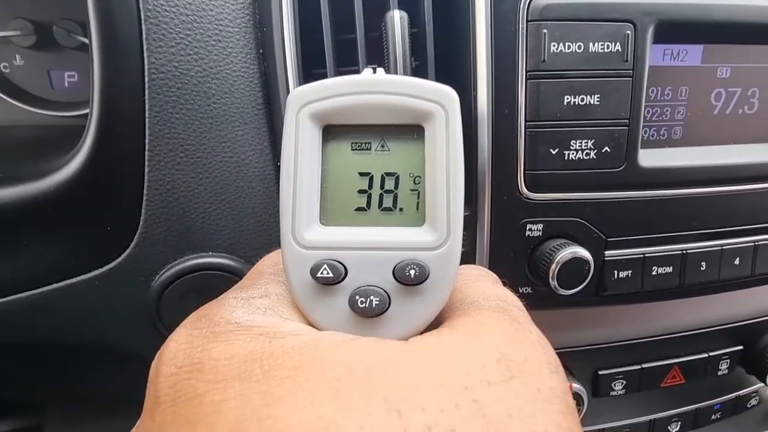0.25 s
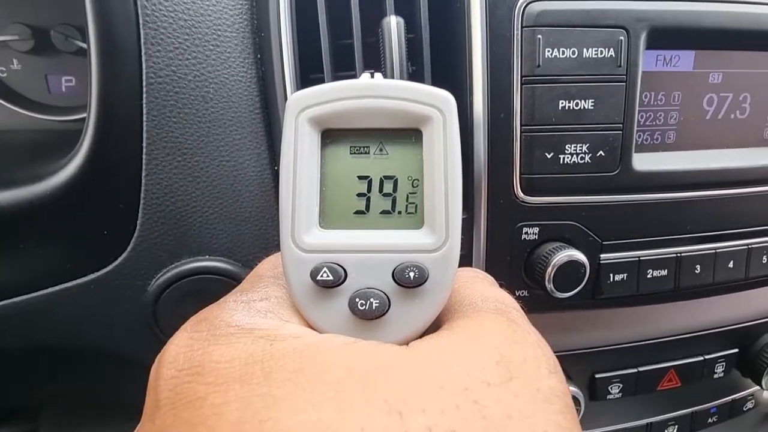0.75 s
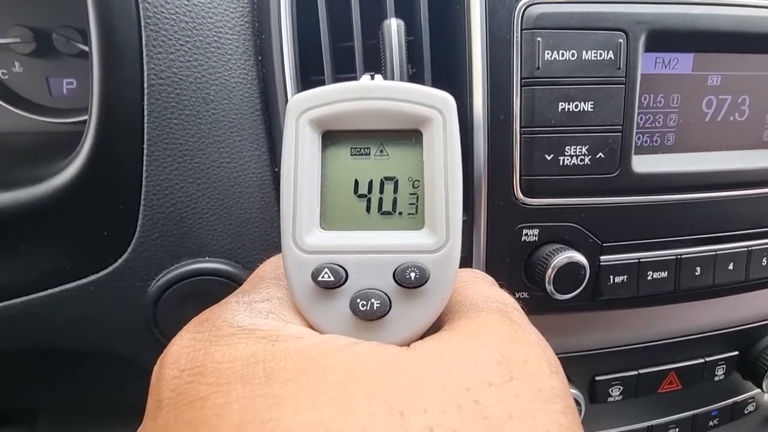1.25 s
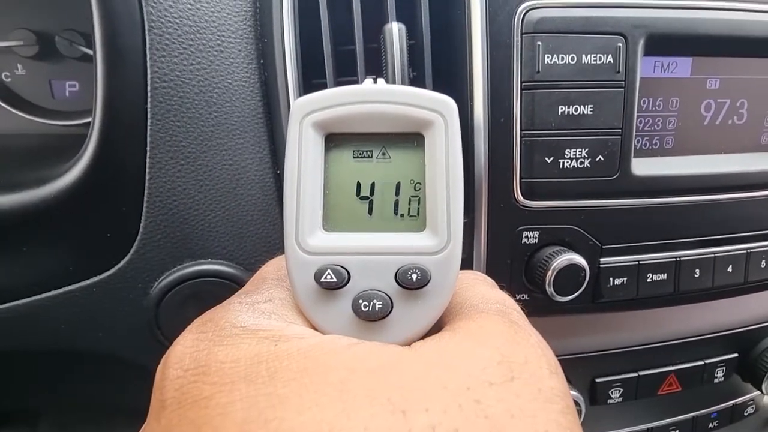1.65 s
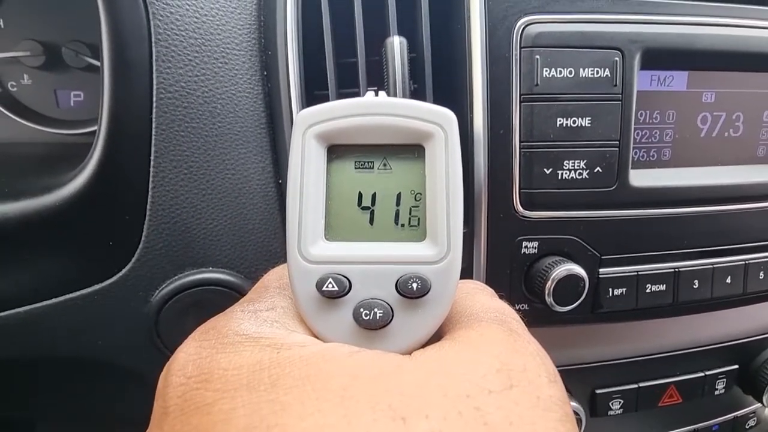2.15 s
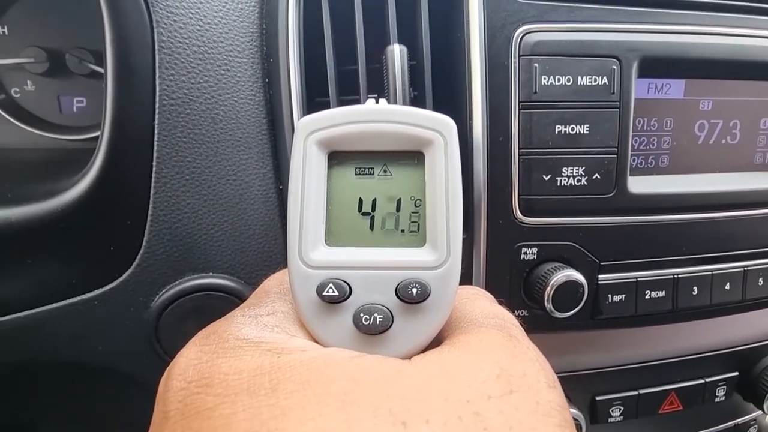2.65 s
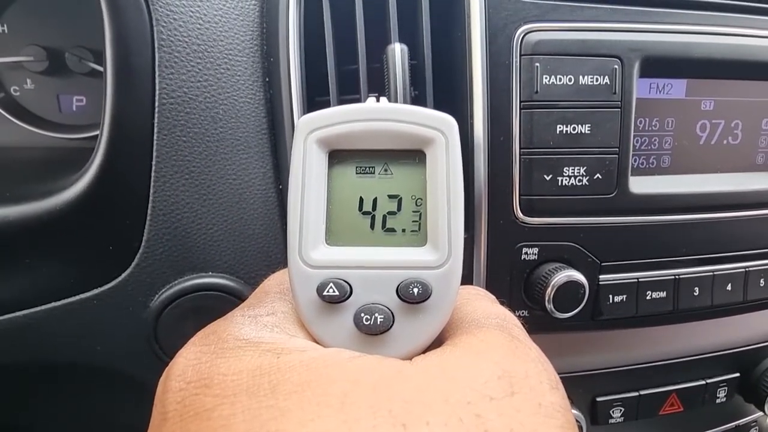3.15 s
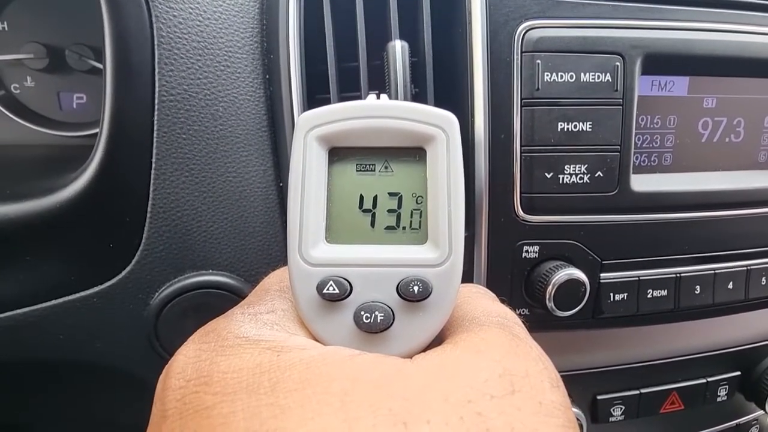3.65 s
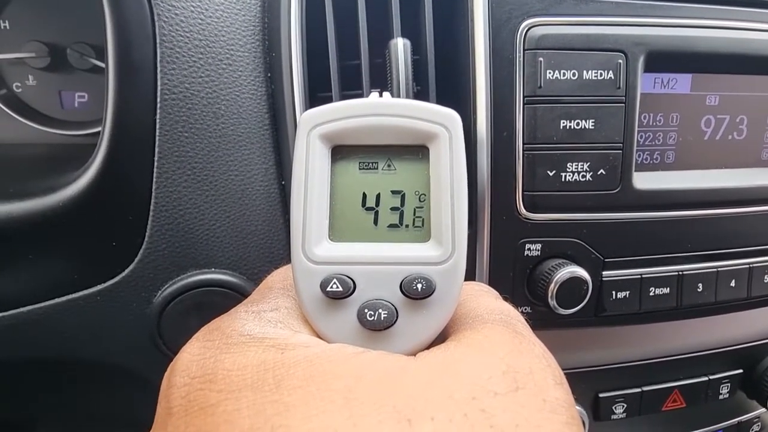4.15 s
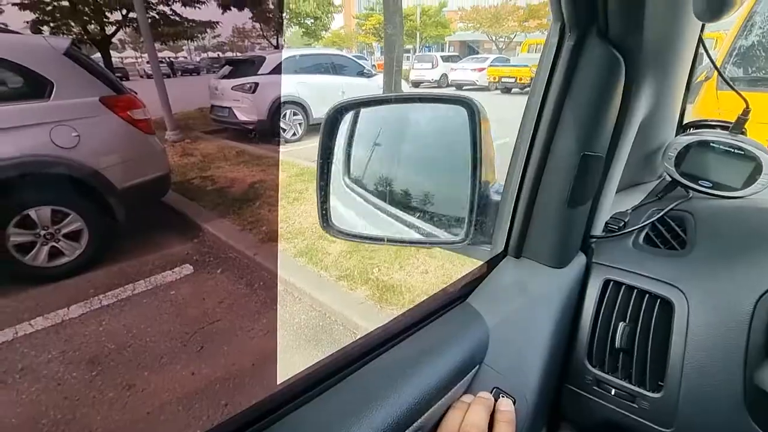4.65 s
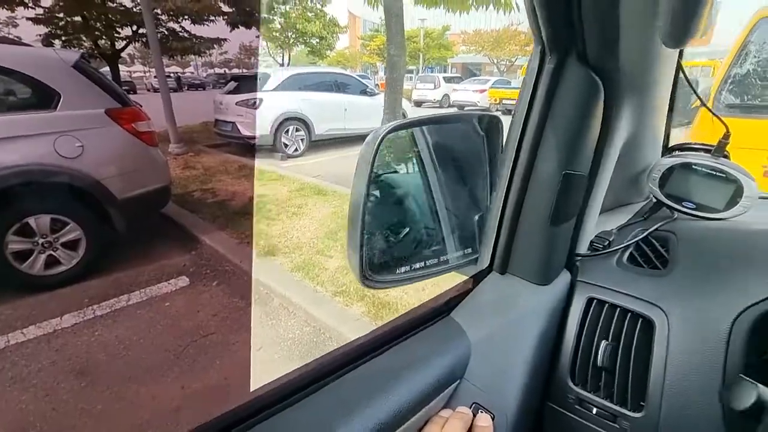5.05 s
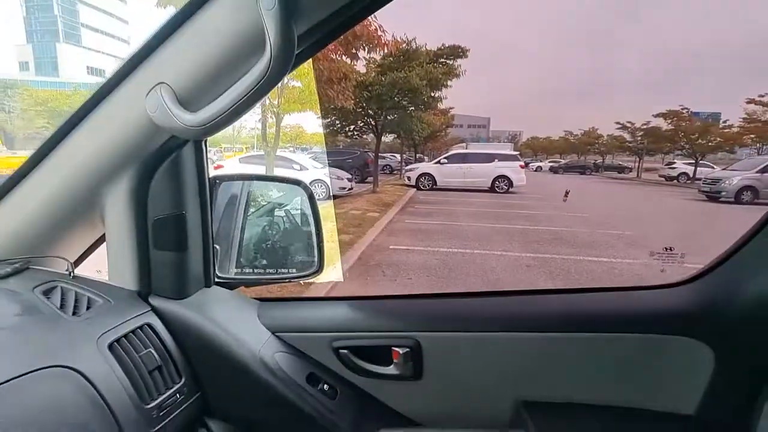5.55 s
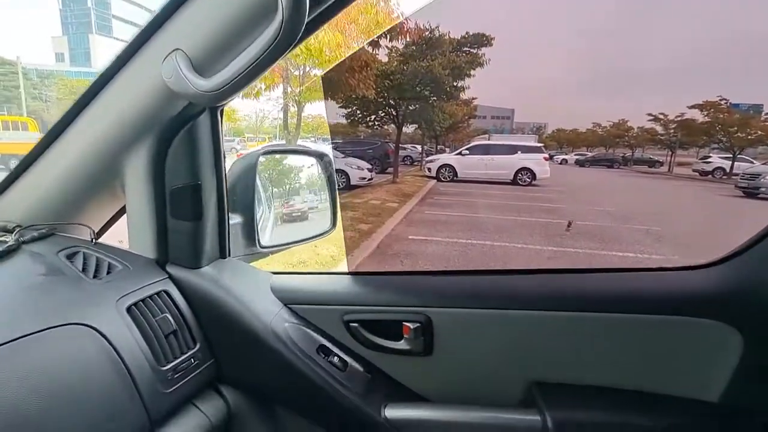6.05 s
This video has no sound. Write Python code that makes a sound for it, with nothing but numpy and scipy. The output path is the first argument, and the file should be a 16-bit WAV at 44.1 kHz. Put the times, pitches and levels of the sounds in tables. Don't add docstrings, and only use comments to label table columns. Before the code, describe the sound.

A tiny scrap of blower noise at 0 s is cut off, leaving silence until 0.12 s. Then a loud, close rush of dashboard vent air holds until 4.37 s: midrange turbulence, low boom and irregular buffeting on the microphone, gusts leaning left, engine idling underneath. Dull panel knocks come near 0.95, 1.7, 3.4 and 4.1 s; a small hand bump ends it. After a brief silence, from 4.45 s the cabin is far quieter, with a soft engine hum sped up to triple pitch and muffled bay noise. A very faint high belt tone arcs around 4.6-5.0 s. Around 5.2 s the sound shifts from left door to right, with slight hiss and a tiny tick at 5.53 s. At 5.93-5.98 s a plastic switch clicks sharply, with soft door thuds; then a window motor whines, rising quickly and sagging, with low door hum and faint sliding hiss until the cut at 6.4 s.

```python
import sys
import numpy as np
from scipy import signal
from scipy.fft import rfft, irfft, next_fast_len
from scipy.io import wavfile
from scipy.ndimage import uniform_filter1d

SR = 44100
rng = np.random.default_rng(int(sys.argv[2]) if len(sys.argv) > 2 else 0)


def transcribe(signal):
    frames = np.atleast_2d(signal).T
    limited = np.clip(frames, -1, 1)
    pcm = np.round(limited * 32767).astype(np.int16)
    wavfile.write(sys.argv[1], SR, pcm)


def level_to_linear(level):
    exponent = np.asarray(level, float) / 20
    return 10 ** exponent


N = 278271
T_S = np.arange(N) / SR
FIRING_HZ, SPEED_UP = 26.0, 3

# (start [s], end [s])
SHOTS = [
    (0, .0243),
    (.1204, 4.3655),
    (4.4523, 6.4),
]

# (multiple of firing rate [1], left [dB], right [dB])
IDLE_AT_VENT = [(0.75, -51, -51), (1, -43, -44), (2, -43, -43), (3, -44, -49), (4, -56, -54), (5, -58, -59),
                (6, -52, -53), (7, -49, -59), (8, -56, -66), (12, -69, -66), (14, -65, -64), (15, -65, -72),
                (16, -65, -69), (17, -64, -61), (18, -72, -55), (19, -58, -64), (20, -74, -57),
                (21, -62, -67), (22, -57, -58), (23, -65, -61), (24, -58, -62), (25, -75, -64),
                (26, -64, -78), (28, -63, -69), (30, -75, -80), (32, -76, -73), (34, -73, -84)]
IDLE_LEFT_DOOR = [(0.75, -69, -71), (1, -60, -62), (1.75, -77, -77), (2, -63, -65), (2.75, -74, -79),
                  (3, -51, -54), (4, -60, -64), (5, -68, -70), (6, -68, -69), (7, -70, -70), (8, -76, -87),
                  (9, -81, -75), (11, -77, -80), (14, -84, -88), (18, -76, -86), (20, -83, -78),
                  (21, -86, -89), (23, -80, -76), (24, -79, -85)]
IDLE_RIGHT_DOOR = [(0.75, -70, -72), (1, -63, -65), (1.75, -74, -76), (2, -59.5, -62.5), (2.75, -69, -71),
                   (3, -66, -69), (4, -73, -69), (5, -87, -85), (6, -78, -91), (7, -70, -77), (8, -83, -90),
                   (9, -88, -93), (11, -86, -100), (14, -88, -89), (18, -78, -86), (20, -78, -84),
                   (21, -79, -84), (23, -83, -98), (24, -86, -86)]

# (frequency [Hz], likeness [0-1], right lead [rad], left-right [dB])
PORTS_AT_VENT = [(38, .75, -.1, 1.5), (90, .5, -.1, 6), (125, .33, 0, 10), (165, .4, .2, 5),
                 (230, .35, .8, 5), (334, .22, 1.5, 5), (470, .42, 1.1, 0), (570, .5, 1, 0),
                 (700, .33, 2.8, 2), (1100, .35, 3, 1.5), (1600, .62, 3.5, 0), (2200, .42, 3.7, -2),
                 (2700, .15, 3.7, -4), (7000, .2, 3.7, -2.5)]
PORTS_LEFT_DOOR = [(38, 0.99, 0.0, 1.5), (81, 1.0, 0.0, 1.9), (140, 0.99, -0.0, 1.7), (224, 0.99, 0.1, 2.7),
                   (334, 0.99, -0.0, 2.9), (473, 0.93, 0.1, 1.2), (669, 0.85, 0.8, 0.5),
                   (959, 0.65, 0.8, 3.3), (1356, 0.48, 2.2, 4.7), (1876, 0.65, 3.1, 0.8),
                   (2653, 0.7, 2.1, 0.4), (4000, 0.51, 2.9, 0.0), (6708, 0.32, 4.5, -2.3),
                   (11618, 0.37, 3.4, -1.7)]
PORTS_RIGHT_DOOR = [(38, 0.99, 0.0, 2.0), (81, 0.99, 0.0, 1.9), (140, 0.99, 0.0, 2.5),
                    (224, 0.99, -0.0, 1.5), (334, 0.97, -0.0, 0.8), (473, 0.65, -0.7, 1.2),
                    (669, 0.71, -0.9, 7.4), (959, 0.71, 0.3, 5.5), (1356, 0.48, -0.2, 1.6),
                    (1876, 0.64, 0.3, 4.5), (2653, 0.61, 3.4, -0.7), (4000, 0.58, 3.4, -0.3),
                    (6708, 0.37, 3.6, -0.8), (11618, 0.36, 3.6, -1.9)]

# (frequency [Hz], density [dB per Hz])
BUFFET_COLOUR = [(12, -43.5), (18, -11), (40, -4.5), (65, 3.5), (100, -1), (125, -11), (200, -20),
                 (400, -26.5), (800, -84.5), (3000, -120)]
RUSH_COLOUR = [(150, -17.5), (280, -5), (410, -6.5), (540, -2.5), (700, -6.5), (880, -13.5), (1500, -14.5),
               (2300, -22.5), (3400, -25), (4300, -26.5), (4800, -33.5), (6700, -31.5), (8200, -40.5),
               (10000, -53), (12000, -57), (12100, -68), (12700, -64), (12900, -95)]
BOOM_COLOUR = [(100, -31), (140, -9.5), (165, -3.5), (188, 0), (215, -3), (260, -19.5), (400, -32.5),
               (600, -90.5), (3000, -120)]
CABIN_LEFT_COLOUR = [(20, -40), (45, -17), (65, -8), (120, -4), (240, 3), (420, -6), (700, -6), (1250, -17),
                     (1600, -11), (2100, -17.5), (3000, -21), (6000, -26.5), (11700, -36), (13000, -50)]
CABIN_RIGHT_COLOUR = [(40, -30), (65, -4), (120, -9.5), (240, 0.5), (310, -4), (360, -6.5), (460, -14.5),
                      (600, -11), (900, -23.5), (1600, -25), (2400, -21), (6000, -31.5), (11000, -39),
                      (13000, -47)]
HISS_COLOUR = [(2000, -13), (4000, -7), (8000, -4), (12000, -6), (15700, -7), (15900, -48)]

# (frequency [Hz], width [Hz], left [dB], right [dB])
DASH_WAVES = [(450, 25, 0, 1.5), (590, 25, -1.5, -3.5), (716, 16, -3.5, -4), (776, 25, 4, 4),
              (994, 40, 2, 5.5), (1051, 46, 5, -4.5), (1154, 35, -5, 2), (1507, 77, 2, 3),
              (1685, 48, -4, -2.5), (1854, 52, 4, -2.5), (2036, 79, 2, 4.5), (2270, 150, 0.5, 2),
              (2410, 110, 1.5, 5), (2600, 80, 2, 1.5), (3380, 59, 1.5, 4.5), (6630, 160, -1, 0.5),
              (7540, 260, 4, 3), (8700, 100, 5, -1)]
TRIM_LEFT = [(350, 12, 0, 1), (430.4, 20, 5, 7.5), (636, 22, 5, 3), (2390, 260, 11.5, 12.5),
             (2800, 100, 6, 6)]
TRIM_RIGHT = [(208.7, 9.9, 8.1, 6.9), (537, 25, 2.3, 5.5), (631, 12, 7.1, 6), (1024, 88, 9.1, 7),
              (1540, 97, 10, 5.1), (1922, 94, 4.6, 1.5)]
BUFFET_PEAKS = [(51.6, 5.9, 4.5, 5), (77.7, 14, 4.5, 4.5)]

# (time [s], buffeting [dB])
DRAUGHT = [(0.13, -43.5), (0.42, -33.5), (0.74, -41.5), (0.99, -30.5), (1.0, -33), (2.32, -34),
           (2.34, -28.5), (2.49, -32.5), (2.97, -36), (3.57, -30), (3.59, -37.5), (3.85, -30.5),
           (4.15, -41), (4.36, -29.5)]
# (time [s], buffeting [dB], duct boom [dB], half length [s])
GUSTS = [(.01, -7, -3, .03), (0.402, 3, 4, 0.043), (0.553, 7, -5, 0.023), (.68, -0.5, -2, 0.045),
         (0.987, 3.5, 0.5, 0.026), (1.04, -4, -2, 0.022), (1.099, 3.5, 6, 0.024), (1.349, 2, 4, .03),
         (1.398, -7, 0, .02), (1.45, 2, -2, 0.034), (1.662, 6, 3.5, 0.022), (1.712, -1.5, -3, .03),
         (1.80, 2, -4.5, 0.032), (2.056, 3, 0, 0.028), (2.26, 1.5, -8, 0.022), (2.305, 0, 5.5, 0.019),
         (2.355, 1.5, -4.5, 0.063), (2.497, -0.5, -8, .03), (2.693, 1.5, 3.5, 0.064), (2.91, 3.5, 5, 0.036),
         (2.962, -4.5, -4.5, 0.037), (3.128, 4, 2, .03), (3.561, 4.5, 2, 0.027), (3.597, -5, -4.5, .03),
         (3.726, 3, 5.5, 0.041), (3.854, 0.5, 4.5, 0.043), (4.03, -3, -4.5, .05), (4.17, -4, -3, .04),
         (4.258, 5, 0, .02), (.27, -0.5, 3.5, .05), (1.92, 2, -1.5, .04), (4.21, -2.5, 0, .03),
         (4.31, -1, 0.5, .025), (0.332, 0, 3, .03), (.50, 2, 0.5, .02), (0.622, 1.5, 0, .03),
         (1.76, 2, -1, .02), (3.043, 2, -1, .03), (3.30, 1, 1, .03)]
# (time [s], left-right [dB])
AIM = [(0.1, -2.5), (.7, -3), (1.2, 0), (2.2, -0.5), (2.8, 0), (3.7, 0), (4.0, -0.5), (4.36, -3)]
# (time [s], peak [dB])
PANEL_KNOCKS = [
    (1.722, -31),
    (.953, -40),
    (3.375, -40),
    (4.144, -38),
]
# (peak time [s], height [full scale], rise [s])
END_SWINGS = [
    (.022, .026, .008),
    (4.363, -.05, .007),
]

# (time [s], knock peak [dB], rub rms [dB], left-right [dB], length [s])
CONTACTS = [(4.347, -43, -54, -14, 0.00039), (4.4715, -71, -57, -5, 0.0034), (5.528, -64, -68, 5, 0.0028),
            (5.532, -68, -74, 6, 0.0046), (5.929, -70, -56, 0, .01), (5.931, -57, -62, 3, 0.0051),
            (5.935, -50, -48, 1, 0.0086), (5.9412, -56, -62, 3, 0.0045), (5.9446, -54, -60, 3, 0.004),
            (5.949, -55, -62, 11, 0.0043), (5.96, -57, -49.5, -2, 0.0075), (5.967, -58, -62, 0, 0.0042),
            (5.982, -67, -58, -5, 0.021)]
# (frequency [Hz], level [dB], T60 [s])
SWITCH_MODES = [(169, -10, .035), (300, -9, .025), (704, -23, .01), (1055, -8.5, 0.079), (1400, -19, .009),
                (1770, -13, .009), (2055, 1.5, 0.019), (2430, -0.5, 0.014), (2900, -15, .007),
                (3300, -15, .012), (3790, -14, 0.016), (4430, -20, .006)]
# (time [s], peak [dB])
SPRING_TICKS = [
    (4.4712, -62),
    (4.5315, -60),
]
# (time [s], peak [dB], frequency [Hz], T60 [s], left-right [dB])
PART_RINGS = [(1.088, -38, 300, .05, 3), (3.545, -37, 300, .06, 3), (3.745, -40, 310, .06, 3),
              (3.893, -36, 290, .07, 3), (4.955, -58, 115, .2, 2), (5.5292, -47, 2200, .012, 5),
              (5.5325, -55, 1055, .05, 6), (5.9414, -33.5, 2055, .022, 1), (5.9416, -36.5, 2430, .017, 2.5),
              (5.9425, -48, 1055, .075, 2), (5.9445, -49, 3790, .02, 2), (5.9435, -48, 3250, .016, 2),
              (5.935, -46, 350, .06, 1), (5.945, -50, 78, .12, 2), (5.9495, -46, 2200, .014, 8),
              (5.9675, -55, 2000, .012, 0)]
# (time [s], peak [dB])
DOOR_THUDS = [
    (5.9346, -42),
    (5.9475, -44),
    (5.9593, -42),
]
# (frequency [Hz], level [dB], T60 [s])
DOOR_SKIN = [(78, -7, .08), (160, -4, .07), (240, -8, .05), (350, -7, 0.054)]
# (time [s], commutator rate [Hz], whine [dB], door hum [dB])
MOTOR_SPEED = [(5.985, 1962, 0, 0), (5.994, 2020, -2, -2), (6.002, 2283, -4, 0), (6.022, 2440, -1, -5),
               (6.04, 2410, 1, 4), (6.066, 2387, 0, -1), (6.106, 2335, 1, 0.5), (6.16, 2368, -3, -3),
               (6.197, 2385, -6, 0), (6.24, 2295, 0, 0.5), (6.282, 2185, -1, -1), (6.32, 2140, -4, 2)]


def rms_one(x):
    return x / np.sqrt(np.mean(x ** 2) + 1e-20)


def peak_one(x):
    return x / np.max(np.abs(x))


def in_time(rows):
    s, *columns = np.transpose(rows)
    return [np.interp(T_S, s, c) for c in columns]


def at_hz(points, hz):
    f, *columns = np.transpose(points)
    return [np.interp(np.log(hz + 1), np.log(f), c) for c in columns]


def ramp(start_s, length_s):
    return np.clip((T_S - start_s) / length_s, 0, 1)


def balance(left_right_db):
    return level_to_linear(np.outer([.5, -.5], left_right_db))


def impulses(events):
    out = np.zeros(N)
    for s, db in events:
        out[round(s * SR)] = level_to_linear(db)
    return out


def ring(force, hz, t60_s):
    r, w = level_to_linear(-60 / (t60_s * SR)), 2 * np.pi * hz / SR
    return signal.lfilter([0, np.sin(w)], [1, -2 * r * np.cos(w), r * r], force + 1e-18)


def drift(rate_hz, count=1):
    hop = 40
    r = np.exp(-2 * np.pi * hop * rate_hz / SR)
    coarse = rng.standard_normal((count, N // hop + 2002))
    slow = signal.lfilter([1], [1, -2 * r, r * r], coarse)[:, 2000:]
    return np.array([np.interp(np.arange(N) / hop, np.arange(len(s)), rms_one(s)) for s in slow])


def echoes(hz):
    level_db, mean_delay_s = -18, .008
    delays_s = mean_delay_s * rng.uniform(.3, 1.7, (2, 6, 1))
    reflected = np.exp(-2j * np.pi * hz * delays_s).sum(axis=1)
    return 1 + level_to_linear(level_db) * hz / (hz + 900) * reflected


def air(colour, ports, flicker_db, flicker_hz, start_s, end_s, peaks=()):
    a, b = int(start_s * SR), min(int(end_s * SR), N)
    size = next_fast_len(b - a)
    hz = np.arange(size // 2 + 1) * SR / size
    alike, lead, balance_db = at_hz(ports, hz)
    left, other = rfft(rng.standard_normal((2, size)))
    right = alike * left * np.exp(1j * lead) + np.sqrt(1 - alike ** 2) * other
    colour_db = at_hz(colour, hz)[0]
    for f, width, *db in peaks:
        colour_db = colour_db + np.outer(db, 1 / (1 + (2 * (hz - f) / width) ** 2))
    pair = level_to_linear(colour_db) * echoes(hz) * balance(balance_db) * np.array([left, right])
    octave = np.clip(np.log2(hz / 40 + 1e-9), 0, 8)
    gains = level_to_linear(flicker_db * (drift(flicker_hz, count=9) + .5 * drift(flicker_hz / 5)))
    out = np.zeros((2, N))
    for k, gain in enumerate(gains):
        band = np.cos(np.pi / 2 * np.clip(octave - k, -1, 1)) ** 2
        out[:, a:b] += gain[a:b] * irfft(pair * band, size)[:, :b - a]
    return out / np.std(out[:, a:b].mean(axis=0))


def idle(orders, ports, firing_hz, wobble_db):
    turn, out = 2 * np.pi * firing_hz * T_S, np.zeros((2, N))
    for (k, left_db, right_db), breath in zip(orders, drift(3.0, count=len(orders))):
        start, lead = rng.uniform(0, 2 * np.pi), at_hz(ports, k * firing_hz)[1]
        line = np.sin(round(k * 4) / 4 * turn + start + np.array([[0], [lead]]))
        out += np.sqrt(2) * level_to_linear(np.array([[left_db], [right_db]]) + wobble_db * breath) * line
    return out


def belt_whistle():
    top_hz, top_s, bend_hz_per_s2, wander_hz = 4150, 4.87, 1600, 4
    hz = top_hz - bend_hz_per_s2 * (T_S - top_s) ** 2 + wander_hz * drift(3.3)[0]
    heard = ramp(4.62, .08) - ramp(4.94, .07)
    level_db = -87 + 1.2 * drift(12.0)[0]
    return np.sqrt(2) * heard * level_to_linear(level_db) * np.sin(2 * np.pi * np.cumsum(hz) / SR)


def quiet_cabin():
    switch_s, jolt_db, jolt_fade_s = 5.93, 4.5, 0.1
    rest_hiss_db, reach_hiss_db, glass_hiss_db = -101, -83, -77.5
    reach_s, reach_rise_s, reach_hold_s, reach_fall_s = 5.3, .15, 0.28, .17
    swung = ramp(5.15, .15)
    pressed = ramp(switch_s - .01, 0.04)
    shake_db = jolt_db * pressed * np.exp(-np.maximum(T_S - switch_s, 0) / jolt_fade_s)
    reach = ramp(reach_s, reach_rise_s) - ramp(reach_s + reach_rise_s + reach_hold_s, reach_fall_s)
    hiss_rise_db = np.maximum(reach * (reach_hiss_db - rest_hiss_db), pressed * (glass_hiss_db - rest_hiss_db))
    left = level_to_linear(-57.5) * air(CABIN_LEFT_COLOUR, PORTS_LEFT_DOOR, 0.97, 24.0, 4.4, 5.6, TRIM_LEFT)
    right = air(CABIN_RIGHT_COLOUR, PORTS_RIGHT_DOOR, 1.64, 25.0, 4.9, 6.4, TRIM_RIGHT)
    right *= level_to_linear(-54.5 + shake_db)
    left += idle(IDLE_LEFT_DOOR, PORTS_LEFT_DOOR, FIRING_HZ * SPEED_UP, 0.68)
    right += idle(IDLE_RIGHT_DOOR, PORTS_RIGHT_DOOR, FIRING_HZ * SPEED_UP, 1.2)
    hiss = level_to_linear(rest_hiss_db + hiss_rise_db) * air(HISS_COLOUR, PORTS_RIGHT_DOOR, .4, 15.0, 4.4, 6.4)
    return np.sqrt(1 - swung) * left + np.sqrt(swung) * right + hiss + belt_whistle()


def part_rings():
    out = np.zeros((2, N))
    for s, db, hz, t60_s, pan_db in PART_RINGS:
        start = round(s * SR)
        age_s = np.arange(N - start)[:SR // 2] / SR
        cycles = age_s * hz
        rung = (1 - np.exp(-cycles)) * level_to_linear(db - 60 * age_s / t60_s) * np.sin(2 * np.pi * cycles)
        out[:, start:start + len(rung)] += balance(pan_db) * rung
    return out


def clicks():
    free_ring_s = .0015
    out, age_s = np.zeros((2, N)), np.arange(3000) / SR
    soft = signal.butter(4, 4500, fs=SR, output="sos")
    no_push = signal.butter(2, 120, "high", fs=SR, output="sos")
    bright = signal.butter(1, [2500, 12000], "band", fs=SR, output="sos")
    for s, knock_db, rub_db, pan_db, length_s in CONTACTS:
        dull = min(0.13 + 84 * length_s, 0.98)
        swell = age_s / length_s * 4 * np.exp(1 - age_s / length_s * 4)
        grains, left, right = rng.standard_normal((3, len(age_s))) * swell
        grains = signal.sosfilt(soft, grains / np.sqrt(np.sum(grains ** 2)))
        body = np.zeros(len(age_s))
        for hz, db, t60_s in SWITCH_MODES:
            mode = peak_one(ring(grains, hz, t60_s * min(length_s / free_ring_s, 1)))
            body += level_to_linear(db - 8 * (dull - .3) * np.log2(hz / 2000)) * mode
        knock = level_to_linear(knock_db) * signal.sosfilt(no_push, body)
        rub = level_to_linear(rub_db) * signal.sosfilt(bright, [left, right])
        start = int(s * SR)
        out[:, start:start + len(age_s)] += balance(pan_db) * (knock + rub)
    return out + ring(impulses(SPRING_TICKS), 5000, .015)


def door_thuds():
    pushes = np.convolve(-impulses(DOOR_THUDS), np.hanning(40) / 20)[:N]
    skin = sum(level_to_linear(db) * ring(pushes, hz, t60_s) for hz, db, t60_s in DOOR_SKIN)
    return signal.sosfilt(signal.butter(4, 50, "high", fs=SR, output="sos"), skin)


def window_motor():
    segments, full_load_hz_per_s = 8, 500
    hz, whine_db, hum_db = in_time(MOTOR_SPEED)
    turn = 2 * np.pi * np.cumsum(hz) / SR
    slowing = np.tanh(-np.gradient(hz) * SR / full_load_hz_per_s)
    load_db = 3 * uniform_filter1d(slowing, size=1200)
    kick_db = 11 * np.exp(-((T_S - 5.996) / .010) ** 2)
    whine_db = -66.5 + whine_db + .5 * load_db + 0.74 * kick_db + 1.0 * drift(30.0)[0]
    hum_db = -52.5 + hum_db + .4 * load_db + .8 * kick_db + 1.2 * drift(40.0)[0]
    whine = level_to_linear(whine_db) * np.sin(turn) * balance(3)
    hum = level_to_linear(hum_db) * np.sin(turn / segments)
    return np.sqrt(2) * ramp(MOTOR_SPEED[0][0], 0.0076) * (whine + hum)


def gusts():
    swells = np.zeros((2, N))
    for s, buffet_db, boom_db, half_s in GUSTS:
        swells += np.outer([buffet_db, boom_db], np.exp(-((T_S - s) / half_s) ** 2))
    return swells


def evened(pair):
    window, share = int(.09 * SR), .8
    power = uniform_filter1d(pair.mean(axis=0) ** 2, size=window)
    power = uniform_filter1d(power, size=window)
    return pair / (np.maximum(power, 0) + .02) ** (share / 2)


def panel_knocks():
    ringing = ring(impulses(PANEL_KNOCKS), 463, 0.07)
    return np.convolve(ringing, np.hanning(50) / 20)[:N]


def blower():
    swell_db, boom_swell_db = gusts()
    buffet_db = in_time(DRAUGHT)[0] + swell_db
    gust_db = buffet_db + 35
    boom_db = -44.5 + 0.51 * (gust_db - swell_db) + boom_swell_db + 0.6 * drift(4.2)[0]
    rush = level_to_linear(-47.5) * air(RUSH_COLOUR, PORTS_AT_VENT, 0.68, 13.0, 0, 4.4, DASH_WAVES)
    buffet = evened(air(BUFFET_COLOUR, PORTS_AT_VENT, 2.3, 9.3, 0, 4.4, BUFFET_PEAKS))
    boom = evened(air(BOOM_COLOUR, PORTS_AT_VENT, 1.9, 13.0, 0, 4.4))
    draught = level_to_linear(buffet_db - 1.5) * buffet + level_to_linear(boom_db) * boom
    lean = balance(-1.8 + in_time(AIM)[0] + 1.0 * gust_db)
    opening = level_to_linear(-80) * air(HISS_COLOUR, PORTS_AT_VENT, .3, 8.0, 0, 0.038)
    engine = idle(IDLE_AT_VENT, PORTS_AT_VENT, FIRING_HZ, 2.2)
    pushes = np.array([np.cos(np.pi / 2 * np.clip((T_S - s) / rise_s, -1, 1)) ** 2
                       for s, height, rise_s in END_SWINGS])
    ducked = 1 - pushes.sum(axis=0)
    thumps = np.array(END_SWINGS)[:, 1] @ pushes
    return rush + opening + panel_knocks() + ducked * (lean * draught + engine) + thumps


def scene():
    late = T_S > SHOTS[1][1]
    cabin = quiet_cabin() + door_thuds() + window_motor()
    return np.where(late, cabin, blower()) + clicks() + part_rings()


def low_pass(x):
    return signal.sosfilt(signal.butter(12, 16530, fs=SR, output="sos"), x)


def record(dry):
    fade_in_s, fade_out_s, top_hz = .0007, .000024, 16400
    sounding = np.zeros(N)
    for start_s, end_s in SHOTS:
        sounding += ramp(start_s, fade_in_s) * np.clip((end_s - T_S) / fade_out_s, 0, 1)
    top_cut = signal.cheby2(12, 60, top_hz, fs=SR, output="sos")
    mix = signal.sosfilt(top_cut, dry * sounding)
    return low_pass(mix)


dry = scene()
out = record(dry)
transcribe(out)
```